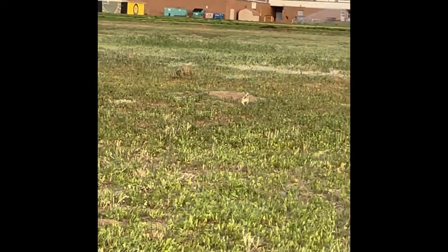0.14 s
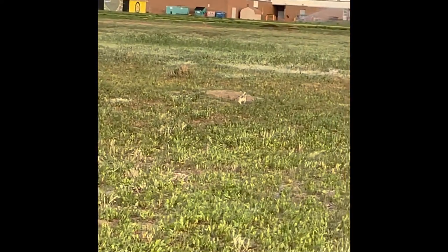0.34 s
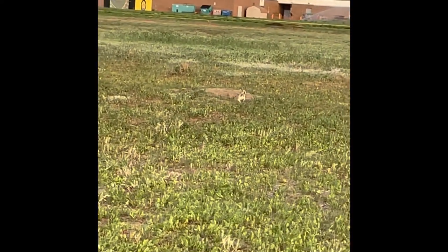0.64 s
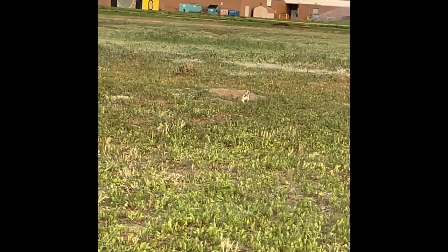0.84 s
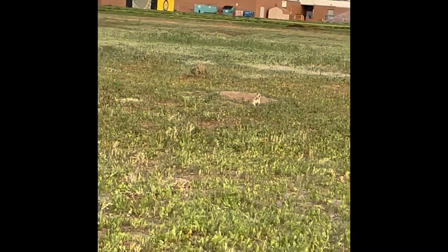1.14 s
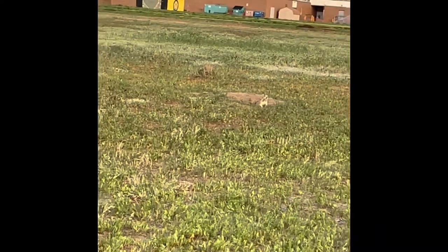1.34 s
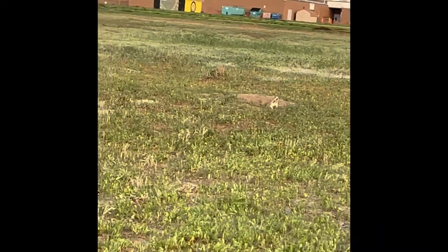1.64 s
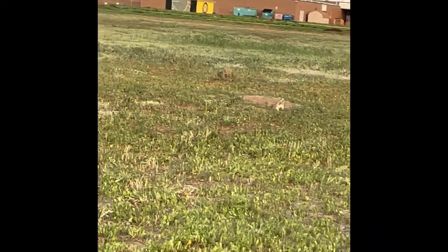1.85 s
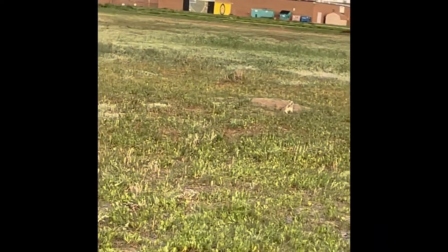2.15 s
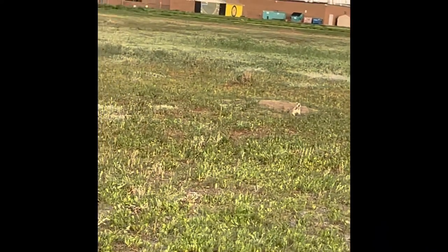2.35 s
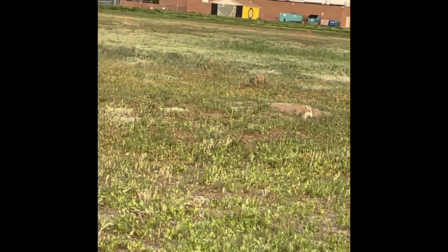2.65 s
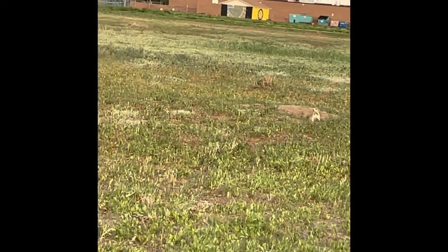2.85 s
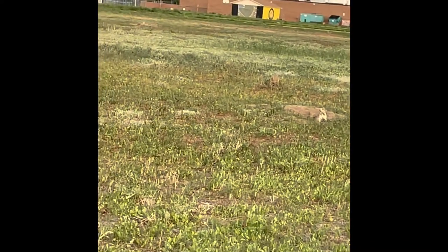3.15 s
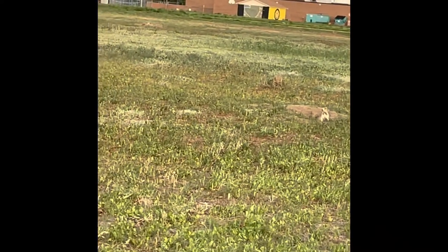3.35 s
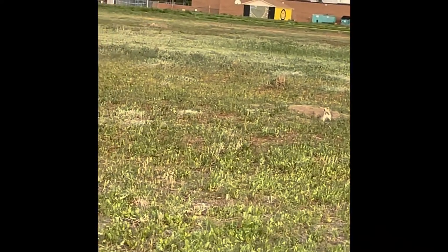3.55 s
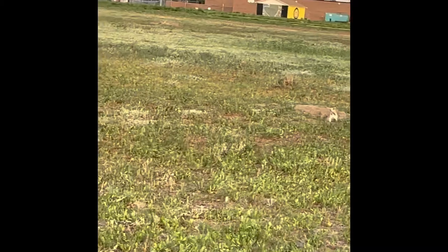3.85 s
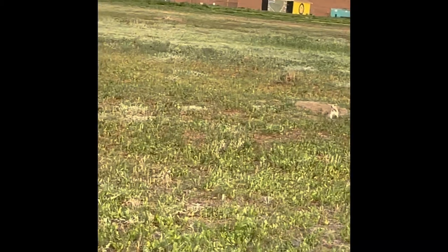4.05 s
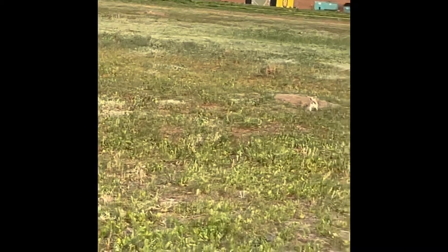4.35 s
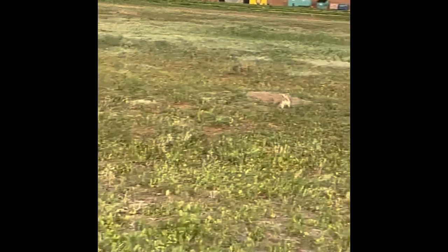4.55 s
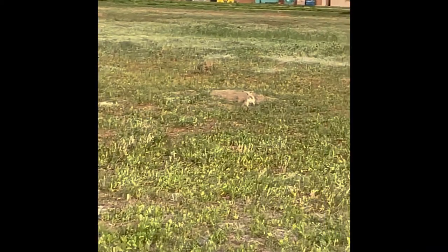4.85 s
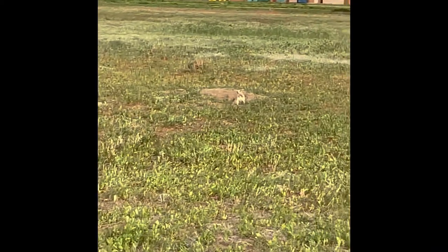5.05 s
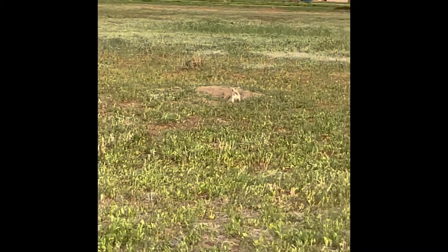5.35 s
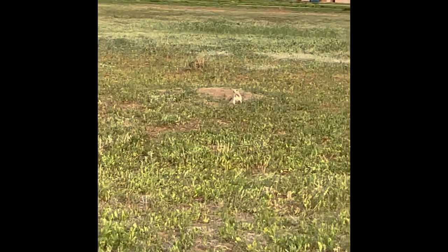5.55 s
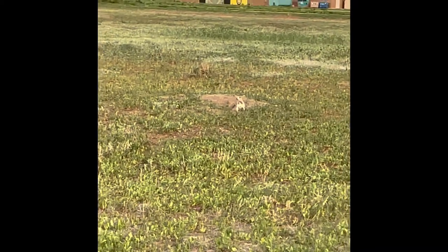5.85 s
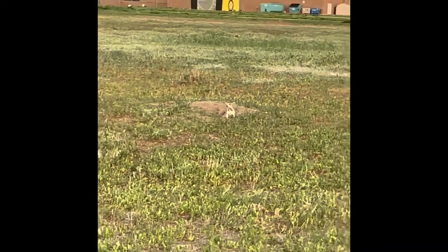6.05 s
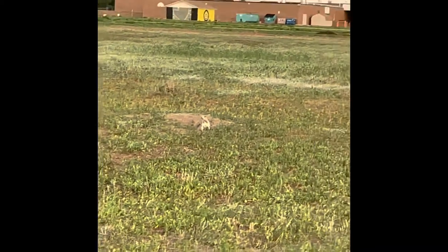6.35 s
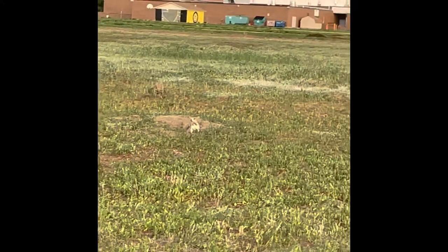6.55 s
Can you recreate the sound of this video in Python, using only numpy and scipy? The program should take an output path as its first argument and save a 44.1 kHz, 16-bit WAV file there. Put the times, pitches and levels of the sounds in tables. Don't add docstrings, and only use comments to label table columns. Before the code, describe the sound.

Several small burrowing rodents bark in alarm on an open grass field. The nearest gives a sharp yip with a lower gasp about twice a second, while others answer with softer, hoarse or higher chirps, some far away. Distant traffic rumbles low, a light breeze stirs crackling dry grass, and fingers tick on the handheld phone.

```python
import sys
import numpy as np
from scipy import signal
from scipy.fft import rfft, irfft, next_fast_len
from scipy.io import wavfile
from scipy.ndimage import uniform_filter1d, map_coordinates

SR = 44100
rng = np.random.default_rng(int(sys.argv[2]) if len(sys.argv) > 2 else 0)


def log_audio(samples):
    frames = np.atleast_2d(samples).T
    limited = np.clip(frames, -1, 1)
    pcm = np.round(limited * 32767).astype(np.int16)
    wavfile.write(sys.argv[1], SR, pcm)


def attenuation_scalar(level_db):
    decades = np.asarray(level_db, float) / 20
    return 10 ** decades


N = 295470
TIME = np.arange(N) / SR


def unit(x):
    return x / np.sqrt(np.mean(np.abs(x) ** 2) + 1e-20)


def along(points, hz):
    f, v = np.transpose(points)
    return np.interp(np.log(hz + 1), np.log(f + 1), v)


def wobble(rate, size=N):
    knots = rng.standard_normal(int(size * rate / SR) + 4)
    return map_coordinates(knots, [np.arange(size) * rate / SR])


def filtered(x, response):
    m = next_fast_len(x.shape[-1] + 4096)
    return irfft(rfft(x, m) * response(np.fft.rfftfreq(m, 1 / SR)), m)[..., :x.shape[-1]]


def bump(at, half_s):
    return np.exp(-((TIME - at) / half_s) ** 2)


def place(out, s, sound):
    out[round(s * SR):][:len(sound)] += sound


def rush(spectrum, apart):
    def response(hz):
        share = np.clip(along(apart, hz), 0, 1)
        return attenuation_scalar(along(spectrum, hz)) * np.sqrt([1 - share, share, share])
    rows = filtered(rng.standard_normal((3, N)), response)
    return rows / np.std(rows[0] + rows[1])


# time in seconds, rumble level in dB, traffic level in dB.
ROAD_LEVELS = [(0.0, -51.5, -58), (0.76, -54.5, -56.5), (1.23, -55, -60), (3.75, -53.5, -62),
               (4.14, -57.5, -62), (4.55, -55, -59.5), (5.99, -53, -60.5), (6.7, -54.5, -57.5)]
# frequency in Hz, level in dB per Hz.
RUMBLE_COLOR = [(22, -38), (36, -12), (56, 0.5), (105, 1.5), (160, -8), (195, -19.5), (230, -70.5)]
# frequency in Hz, differing share from 0 to 1.
RUMBLE_APART = [(50, .05), (160, .5)]


def road_rumble():
    s, rumble_db, _ = np.transpose(ROAD_LEVELS)
    level_db = np.interp(TIME, s, rumble_db) + 1.93 * wobble(4.8)
    return attenuation_scalar(level_db) * rush(RUMBLE_COLOR, RUMBLE_APART)


# frequency in Hz, level in dB per Hz.
TRAFFIC_COLOR = [(300, -38), (400, -9.5), (480, -1), (670, 0), (1240, -5), (1500, -13.5), (2000, -37.5)]


def streaky(rows):
    z = signal.stft(rows, nperseg=2048)[2]
    field = uniform_filter1d(rng.standard_normal(z.shape[1:]), size=4, axis=0)
    field = uniform_filter1d(field, size=5, axis=1)
    return signal.istft(z * attenuation_scalar(1.7 * unit(field)), nperseg=2048)[1][:, :N]


def traffic():
    s, _, traffic_db = np.transpose(ROAD_LEVELS)
    level_db = np.interp(TIME, s, traffic_db) + 1.2 * wobble(8)
    return attenuation_scalar(level_db) * streaky(rush(TRAFFIC_COLOR, [(700, 0.12)]))


# start in seconds, end in seconds, pitch in Hz, level in dB.
ENGINES = [(0, 1.038, 118, -59.5), (.55, 2.41, 154.8, -62.5), (1.9, 4, 101.1, -60),
           (2.302, 3.1, 185.7, -72), (5.05, 5.4, 1200, -70), (4.5, 4.85, 1050, -71)]


def engines():
    out = np.zeros(N)
    for start, end, hz, db in ENGINES:
        fade = np.clip(np.minimum(TIME - start + 0.1, end - TIME) / 0.26, 0, 1)
        level = attenuation_scalar(db + 5.0 + 1.76 * wobble(15))
        phase = 2 * np.pi * np.cumsum(hz * (1 + 0.0148 * wobble(4.99))) / SR
        out += level * fade * np.sin(phase)
    return out


# frequency in Hz, level in dB per Hz.
CHORUS_COLOR = [(900, -28), (1500, 0), (2200, -5.5), (3000, -5), (3600, -5.5), (4200, -16.5), (5600, -38),
                (7500, -54)]


def far_chorus():
    return attenuation_scalar(-65.5 + 1.4 * wobble(11)) * rush(CHORUS_COLOR, [(3000, 0.16)])


# frequency in Hz, level in dB per Hz.
BREEZE_COLOR = [(110, -29.5), (190, -7), (221, -8.5), (450, -8.5), (580, -46), (990, -120)]
# time in seconds, depth in dB, half width in seconds.
LULLS = [
    (.22, 1.5, 0.14),
    (3.4, 3, 0.94),
    (4.13, 13.5, 0.19),
    (5.45, 1, 0.27),
    (5.79, 7, 0.055),
]


def breeze():
    level_db = -64 - 0.46 * TIME + 2.9 * wobble(12)
    for at, depth_db, half_s in LULLS:
        level_db = level_db - depth_db * bump(at, half_s)
    return attenuation_scalar(level_db) * rush(BREEZE_COLOR, [(200, 0.51), (420, 0.23)])


# frequency in Hz, level in dB per Hz.
GRASS_COLOR = [(3500, -40), (4400, -4), (6000, 0), (8500, -4), (11000, -8), (13500, -19), (15500, -12),
               (15900, -60)]
# time in seconds, peak level in dB.
STIRS = [(0.0, -83), (.6, -76.5), (.76, -68.5), (.9, -73), (1.35, -74), (1.68, -81), (2.08, -68.5),
         (2.45, -75), (2.63, -74.5), (3.22, -78), (3.62, -80), (3.8, -68), (4.22, -75), (4.48, -67),
         (4.95, -84), (5.3, -65), (5.45, -82), (5.7, -75), (6.0, -80)]


def grass():
    still_s, still_db_per_s = 6.03, 45
    level = attenuation_scalar(-77.5 - still_db_per_s * np.maximum(TIME - still_s, 0))
    for at, db in STIRS:
        level = level + attenuation_scalar(db) * bump(at, 0.081)
    crackle_db = 2.2 * wobble(30) + .4 * wobble(300)
    return level * attenuation_scalar(5.0 + crackle_db) * rush(GRASS_COLOR, [(8000, 0.072)])


# time in seconds, pitch in Hz, level in dB.
BIRD = [
    (2.786, 7400, -80),
    (2.791, 7180, -56),
    (2.806, 7100, -64),
    (2.83, 6700, -64),
]


def bird():
    s, hz, db = np.transpose(BIRD)
    level = attenuation_scalar(np.interp(TIME, s, db, -200, -200))
    return level * np.sin(2 * np.pi * np.cumsum(np.interp(TIME, s, hz)) / SR)


# time in seconds, peak level in dB.
TICKS = [(.19, -71), (.498, -66), (.675, -58), (.859, -54), (.9, -58), (1.032, -65), (1.171, -65),
         (1.261, -69), (1.277, -67), (1.801, -63), (1.95, -62), (2.037, -58), (2.063, -61), (2.159, -65),
         (2.234, -61), (2.521, -62), (2.677, -58), (2.693, -63), (2.72, -48), (2.973, -68), (3.178, -58),
         (3.355, -65), (3.415, -62), (3.632, -56), (3.904, -62), (3.967, -59), (3.976, -57), (4.068, -65),
         (4.162, -60), (4.177, -56), (4.367, -50), (4.496, -60), (4.608, -62), (4.77, -57), (4.853, -60),
         (5.037, -50), (5.143, -63), (5.163, -64), (5.255, -44), (5.463, -57), (5.505, -66), (5.543, -67),
         (5.58, -66), (5.703, -49), (5.977, -60), (6.004, -52), (6.251, -68)]
# time in seconds, peak level in dB, pitch in Hz.
KNOCKS = [(1.24, -48, 417), (1.95, -45, 304), (1.574, -43, 1050), (1.619, -45, 966), (1.5, -50, 680),
          (2.208, -51, 754), (2.507, -49, 700), (5.169, -55, 1600), (2.508, -51, 2600), (1.6, -50, 900),
          (1.65, -48, 1250), (1.635, -47, 1100), (4.7, -49, 900), (4.55, -53, 1200), (5.9, -51, 850)]


def fingers():
    out, t = np.zeros(N + SR), np.arange(SR // 20) / SR
    color = [(1500, -29), (4000, -2.0), (10000, 2.0), (15500, -8), (16000, -58.5)]  # (Hz, dB)
    for s, db in TICKS:
        snap = attenuation_scalar(-60 * t / .003) * rng.choice([-1, 1], len(t))
        place(out, s, attenuation_scalar(db + 12.5) * filtered(snap, lambda hz: attenuation_scalar(along(color, hz))))
    for s, db, hz in KNOCKS:
        place(out, s, attenuation_scalar(db - 60 * t / 0.04) * np.sin(2 * np.pi * hz * t))
    return out[:N]


# frequency in Hz, time to fall 60 dB in seconds.
WALL_DECAY = [(1500, 0.054), (3500, 0.1), (8000, 0.18)]


def walls(x):
    scatter_db, scatter_t60_s, walls_db, late_s = -18, 0.068, -26, .007
    hz, t, z = signal.stft(rng.standard_normal(SR // 2), SR, nperseg=256)
    tail = signal.istft(z * attenuation_scalar(-60 * t / along(WALL_DECAY, hz)[:, None]), SR, nperseg=256)[1]
    tail = np.pad(attenuation_scalar(walls_db) * tail / np.linalg.norm(tail), (round(late_s * SR), 0))
    decay = attenuation_scalar(-60 * np.arange(len(tail)) / SR / scatter_t60_s)
    mounds = rng.standard_normal(len(tail)) * decay
    return signal.fftconvolve(x, tail + attenuation_scalar(scatter_db) * mounds / np.linalg.norm(mounds))[:N]


# frequency in Hz, level in dB.
BARK_TREBLE = [(7300, 0.5), (7700, -7), (8400, -4.5), (13000, -4)]


def bark(length, top_hz, low_hz, db, rasp, lean, arch, tones, flutter, throat):
    flutter_hz, rasp_start, rasp_middle, rasp_end, breath_db, brighten_db, attack_s = flutter
    n = int(length * SR)
    u = np.arange(n) / n
    leaned = u ** lean
    at, height, swell_db = np.transpose(arch)
    pitch = low_hz + (top_hz - low_hz) * np.interp(leaned, at, height)
    pitch = uniform_filter1d(pitch, int(.0025 * SR) + 1, mode='nearest')
    rough = rasp * np.interp(leaned, [.12, .5, 1], [rasp_start, rasp_middle, rasp_end])
    rough = np.clip(rough, 0, .95)
    waver = (.002 + .01 * rough) * wobble(109, size=n)
    jitter = .025 * rough * wobble(504, size=n)
    phase = 2 * np.pi * np.cumsum(pitch * (1 + waver + jitter)) / SR
    flutter_pitch = flutter_hz * (1 + 0.3135 * wobble(148.9, size=n))
    beat = np.cos(2 * np.pi * np.cumsum(flutter_pitch) / SR + 7 * rng.random())
    lift_db = brighten_db * (pitch - 1900) / 100
    voice = 0
    for k, tone_db in enumerate(tones, 1):
        sides = 0.63 * beat + 0.72 * (wobble(456, size=n) + 1j * wobble(450, size=n))
        level_db = tone_db + (k > 2) * lift_db + (k > 4) * -7 + 0.34 * wobble(91.4, size=n)
        carrier = np.exp(1j * (k * phase + 7 * rng.random()))
        voice = voice + attenuation_scalar(level_db) * np.real((np.sqrt(1 - rough) + np.sqrt(rough) * sides) * carrier)
    breath = unit(filtered(rng.standard_normal(n), lambda hz: attenuation_scalar(along(throat, hz))))
    breath = breath * (1 + 1.6 * beat)
    edges = np.clip(u * length / attack_s, 0, 1) * np.clip((1 - u) * length / (1.1 * attack_s), 0, 1)
    call = voice + attenuation_scalar(breath_db) * np.sqrt(rough + .01) * breath
    call = attenuation_scalar(db + 3 + np.interp(leaned, at, swell_db)) * edges * call
    far_db = 0.45 * min(db + 42.0, 0)
    return filtered(call, lambda hz: attenuation_scalar(far_db * (hz / 6000) ** 2 + along(BARK_TREBLE, hz)))


YIP, GASP, STEADY, CLEAR, HIGH, HOARSE, FAR = range(7)
# lowest pitch in Hz at -50 dB, its drop in Hz per dB louder,
# rasp at the start from 0 to 1, rasp change per second.
HABITS = [(1595, 0.93, 1, -0.079), (1400, 0.1, 0.48, 0.005), (1610, 1, 0.29, 0.073),
          (1568, 6, 0.2, -0.0041), (1583, 3.5, 0.47, 0.0048), (1541, 3.5, 0.89, 0.028),
          (1525, 10, 0.26, 0.062)]
# share of length, height from lowest 0 to top 1, level in dB.
ARCHES = [
    [(0.0, 0.17, -7.5), (0.2, 0.843, -1.5), (0.7, 0.842, -2), (1.0, 0.13, -2.5)],
    [(0.0, 0.93, 1.5), (0.5, 0.69, 0.5), (1.0, 0.18, 0.5)],
    [(0, 0.398, 1), (.2, 0.86, 3.5), (.44, 0.925, 2.5), (.48, 0.4, 3), (.82, 0.25, 3), (1, -0.29, -6.5)],
    [(0.0, 0.204, -3), (0.12, 0.7, 6), (0.35, 0.99, 3), (0.6, 0.9, -0.5), (0.82, 0.384, 4.5),
     (1.0, -0.21, -6)],
    [(0.0, 0.312, 10), (0.12, 0.85, 3), (0.3, 0.93, 4.5), (0.45, 0.8, 0.5), (0.55, 0.33, 3.5),
     (0.85, 0.3, -0.5), (1.0, 0.047, 4.5)],
    [(0, 0.727, 4.5), (.24, 0.725, 6.5), (.36, 0.933, 8), (.6, 0.35, 4), (1, 0.19, -5.5)],
    [(0.0, 0.806, 6), (0.3, 0.83, 1.5), (1.0, 0.033, 1.5)],
]
OVERTONES = [(-11.5, 0.024, 1, -4.5, -8, -19.5), (-9.5, 0.055, -0.5, -3.5, -38.5, -25),
             (-11.5, 0.0082, -7, -11.5, -9, -24), (-17.5, 0.0053, -13, -29, -26, -54),
             (-13, 0.039, -15.5, -15, -16, -38), (-13.5, 0, -11, -15.5, -7, -32),
             (-14, 0.0043, -35.5, -40.5, -30, -53)]
# rate in Hz, rasp factor at start, middle and end, breath in dB,
# brightening in dB per 100 Hz of pitch, attack in seconds.
FLUTTERS = [(667.4, 0.19, 0.91, 0.08, -5.5, 3, 0.00061), (451.6, 0.9, 0.6, 1, -5.5, 0.47, 0.0012),
            (495, 0.35, 0.97, 0.13, -9.5, 2, 0.00097), (415, .25, .6, .5, -9, 9, 0.0012),
            (436, 0.08, 1.1, 0.25, -6, 3.4, .002), (373, .15, 1.0, 0.6, -13, -3.5, 0.00056),
            (390.3, 3, 1.4, 0.45, -8.5, 2.5, 0.0041)]
# frequency in Hz, level in dB.
THROAT = [(1200, -36.5), (1700, -28), (2500, -1), (3500, 2), (4500, -11.5), (5500, 6), (7200, 2.5),
          (8200, -17), (12000, -26), (15500, -32)]
# frequency in Hz, level in dB.
SOFT_THROAT = [(1400, -35.5), (2300, -11), (3200, -0.5), (3900, -3.5), (4500, -22), (5500, -5.5),
               (7200, -13.5), (9000, -20), (15500, -40)]


def utter(out, who, s, length, top_hz, db, rasp=None, lean=1, low_hz=None, catch=(.5, 0), throat=THROAT):
    habit_hz, drop, habit_rasp, tiring = HABITS[who]
    if low_hz is None:
        low_hz = min(top_hz, habit_hz - drop * (db + 50.5))
    if rasp is None:
        rasp = habit_rasp + tiring * s
    sound = bark(length, top_hz, low_hz, db, rasp, lean, ARCHES[who], OVERTONES[who], FLUTTERS[who], throat)
    share, dip_db = catch
    from_catch_s = np.arange(len(sound)) / SR - share * length
    place(out, s, attenuation_scalar(-dip_db * np.exp(-(from_catch_s / .0011) ** 2)) * sound)


# start in seconds, length in seconds, top pitch in Hz, level in dB.
FAR_BARKS = [(0.695, 0.034, 1780, -54.5), (1.05, 0.055, 1844, -57), (1.468, 0.038, 1713, -55.5),
             (1.874, 0.057, 1844, -58), (2.014, 0.076, 1930, -64.5), (2.701, 0.033, 1760, -65),
             (3.022, 0.037, 1730, -50.5), (3.614, 0.016, 1710, -52.5), (3.746, 0.065, 1913, -57.5),
             (3.915, 0.023, 1830, -51.5), (4.21, 0.049, 1815, -61), (4.438, 0.033, 1850, -50),
             (4.82, 0.036, 1780, -60.5), (0.146, 0.022, 1850, -65), (.275, 0.025, 1760, -66.5),
             (.31, 0.07, 2060, -69), (2.742, 0.065, 1860, -66.5), (5.028, 0.031, 1854, -60.5),
             (5.097, 0.031, 1744, -56.5), (5.193, 0.021, 1860, -57), (6.218, 0.038, 1690, -54.5),
             (6.606, 0.04, 1730, -57.5), (6.65, 0.036, 1670, -59), (.047, 0.025, 1870, -51),
             (1.178, 0.027, 1690, -51.5), (2.052, 0.025, 1780, -57), (2.686, 0.016, 1760, -58),
             (4.938, 0.01, 1790, -51), (5.43, 0.059, 1930, -63.5), (4.86, 0.034, 1810, -69),
             (3.376, 0.11, 1820, -68), (.418, 0.011, 1720, -61.5), (4.155, 0.037, 1750, -65.5),
             (5.385, 0.047, 1760, -59.5), (1.8, 0.029, 1710, -67)]


def far_animals(out):
    for s, length, top_hz, db in FAR_BARKS:
        utter(out, FAR, s, length, top_hz, db, throat=SOFT_THROAT)


# start in seconds, length in seconds, top pitch in Hz, level in dB, rasp from 0 to 1.
HOARSE_BARKS = [(0.038, 0.023, 1590, -55, 0.23), (0.373, 0.047, 1800, -52.5, 1),
                (0.798, 0.047, 1878, -52, 1), (1.219, 0.043, 1760, -52.5, 0.91),
                (1.591, 0.05, 1720, -54.5, 0.95), (2.073, 0.05, 1884, -50.5, 1),
                (2.59, 0.044, 1645, -57, 0.81), (2.925, 0.044, 1785, -53, 0.64),
                (4.106, 0.0467, 1805, -51.5, 1), (4.619, 0.058, 1765, -55, 1),
                (5.797, 0.036, 1670, -54.5, 0.59), (6.17, 0.057, 1630, -54.5, 1),
                (2.861, 0.033, 1876, -50, .2)]


def hoarse_animal(out):
    for s, length, top_hz, db, rasp in HOARSE_BARKS:
        utter(out, HOARSE, s, length, top_hz, db, rasp)


# start in seconds, length in seconds, top pitch in Hz, level in dB, lean (over 1 = late top).
HIGH_BARKS = [(0.963, 0.045, 2495, -49.5, 1.6), (1.35, 0.066, 2370, -47, 1),
              (1.731, 0.058, 2240, -46.5, 0.92), (2.393, 0.063, 2232, -47.5, 0.9),
              (3.254, 0.061, 2224, -46.5, 0.83)]


def high_animal(out):
    for s, length, top_hz, db, lean in HIGH_BARKS:
        utter(out, HIGH, s, length, top_hz, db, lean=lean, throat=SOFT_THROAT)


# start in seconds, length in seconds, top pitch in Hz, level in dB, lean (over 1 = late top).
CLEAR_BARKS = [(0.194, 0.044, 2000, -54.5, 1.2), (0.597, 0.045, 1840, -45.5, 0.67),
               (0.729, 0.062, 2067, -54.5, 1.1), (0.992, 0.038, 1905, -47, 1.85),
               (1.427, 0.047, 1980, -54, 2.4), (2.122, 0.05, 2080, -57.5, 1.15),
               (2.559, 0.045, 2030, -67, 1.2), (3.048, 0.046, 1960, -59, 1.2), (3.77, 0.061, 1960, -45, 1),
               (4.246, 0.058, 2046, -47, 1.04), (4.393, 0.067, 1876, -55.5, .95),
               (4.734, 0.05, 1905, -45, 1.3), (5.276, 0.058, 1880, -45, 1.14),
               (5.606, 0.062, 2030, -58, 0.83), (5.677, 0.026, 1730, -52, 1.1),
               (5.818, 0.056, 2017, -46, 1.03), (6.281, 0.049, 1870, -46, 0.96),
               (6.34, 0.039, 1920, -67, 1.7)]


def clear_animal(out):
    for s, length, top_hz, db, lean in CLEAR_BARKS:
        utter(out, CLEAR, s, length, top_hz, db, lean=lean, throat=SOFT_THROAT)


# start in seconds, length in seconds, top pitch in Hz, level in dB, rasp from 0 to 1.
STEADY_BARKS = [(0.223, 0.043, 2123, -41.5, 0.47), (0.549, 0.044, 2045, -42, 0.6),
                (0.913, 0.035, 1908, -40.5, 0.19), (1.302, 0.033, 1964, -41, 0.2),
                (1.631, 0.028, 1867, -42, 0.16), (1.944, 0.033, 1900, -41.5, 0.34),
                (2.287, 0.037, 2000, -41.5, 0.22), (2.635, 0.031, 1892, -42, 0.48),
                (2.988, 0.037, 2007, -39.5, 0.3), (3.3, 0.037, 1902, -40, 0.47),
                (3.702, 0.047, 2098, -40.5, 0.48), (4.019, 0.036, 1980, -40.5, 0.56),
                (4.352, 0.037, 1915, -40.5, 0.39), (4.705, 0.037, 1950, -41, 0.53),
                (4.997, 0.031, 1940, -42, 0.66), (5.334, 0.049, 2040, -41.5, 0.4),
                (5.721, 0.046, 1935, -41, 0.51), (5.997, 0.042, 2113, -44, 1),
                (6.481, 0.041, 1892, -44, 0.38)]
# share of length, dip in dB.
STEADY_CATCHES = [(.42, 7), (.42, 5), (.42, 3), (.52, 2), (.46, 0), (.37, 10), (.42, 2), (.56, 10),
                  (.43, 3), (.55, 4), (.43, 3), (.42, 5), (.38, 8), (.52, 9), (.45, 5), (.42, 3), (.4, 4),
                  (.42, 3), (.4, 5)]


def steady_animal(out):
    for (s, length, top_hz, db, rasp), catch in zip(STEADY_BARKS, STEADY_CATCHES):
        lean = np.log(.46) / np.log(catch[0])
        utter(out, STEADY, s, length, top_hz, db, rasp, lean, catch=catch)


# start in seconds, length in seconds, top pitch in Hz, level in dB,
# top pitch of its gasp in Hz.
YIPS = [(0.066, 0.012, 1906, -34, 1400), (0.62, 0.018, 1998, -33, 1480), (1.118, 0.015, 1920, -31.5, 1483),
        (1.639, 0.016, 1902, -33.5, 1450), (2.328, 0.012, 1923, -32, 1470),
        (2.834, 0.022, 1828, -32.5, 1414), (3.469, 0.013, 1928, -31, 1432), (3.939, 0.016, 1890, -32, 1393),
        (4.462, 0.015, 1848, -30.5, 1353), (4.946, 0.017, 1810, -30.5, 1400),
        (5.242, 0.017, 1850, -31.5, 1227), (5.696, 0.017, 1848, -30.5, 1330),
        (6.102, 0.016, 1946, -32.5, 1290), (6.503, 0.017, 1774, -29.5, 1310)]
# share of length, dip in dB.
YIP_CATCHES = [(.62, 11), (.71, 9), (.6, 7), (.69, 8), (.48, 8), (.72, 12), (.55, 13), (.76, 13), (.6, 7),
               (.68, 10), (.54, 11), (.62, 10), (.46, 7), (.57, 8)]
# fall of pitch in Hz, level in dB, rasp from 0 to 1.
GASPS = [(-22, -51, 0.56), (89, -47.5, 0.35), (99, -46, 0.4), (57, -48, 0.55), (71, -47.5, 0.35),
         (70, -48.5, 0.1), (65, -47, 0.4), (82, -51, 0.7), (69, -49.5, 0.36), (87, -49, 0.95),
         (-46, -52.5, 0.4), (47, -51.5, .8), (-58.5, -52, 0.7), (42, -50.5, 0.94)]


def nearest_animal(out):
    for (s, length, top_hz, db, gasp_hz), catch, (fall_hz, gasp_db, rasp) in zip(YIPS, YIP_CATCHES, GASPS):
        utter(out, YIP, s, length, top_hz, db, catch=catch)
        gasp_s = 0.06 - 0.0011 * s - length
        utter(out, GASP, s + length + .001, gasp_s, gasp_hz, gasp_db, rasp, low_hz=gasp_hz - fall_hz)


def colony():
    out = np.zeros(N + SR)
    for animal in (far_animals, hoarse_animal, high_animal, clear_animal, steady_animal, nearest_animal):
        animal(out)
    return out[:N]


# frequency in Hz, lead of the left port in radians.
LEAD = [(250, 0), (1300, -.9), (2500, .8), (3500, .5), (4700, .05), (6300, 1.6), (7500, 2.15), (9300, 2.85),
        (11500, 2.8), (14000, 3.5), (15400, 4.6)]
# frequency in Hz, left over right in dB.
TILT = [(50, .6), (130, 1.6), (380, 0), (800, -1.1), (2000, 0)]


def scene():
    calls = colony()
    shared, left, right = road_rumble() + breeze() + traffic() + far_chorus() + grass()
    shared = shared + calls + walls(calls) + bird() + engines()
    ports = shared + np.array([left, right]) + attenuation_scalar([[4], [-4]]) * fingers()

    def spread(hz):
        half = attenuation_scalar(along(TILT, hz) / 2) * np.exp(.5j * along(LEAD, hz))
        return np.array([half, 1 / half])
    return filtered(ports, spread)


def band_limit(x):
    return signal.sosfilt(signal.butter(12, 15830, fs=SR, output="sos"), x)


def record(dry):
    return band_limit(filtered(dry, lambda hz: hz < 15830))


dry = scene()
out = record(dry)
log_audio(out)
```